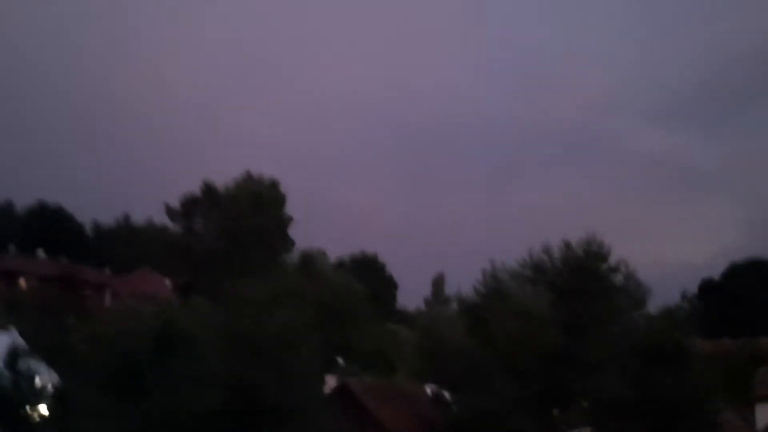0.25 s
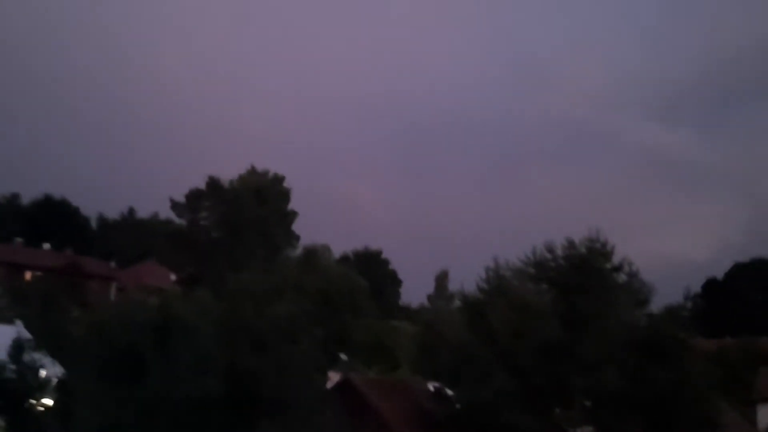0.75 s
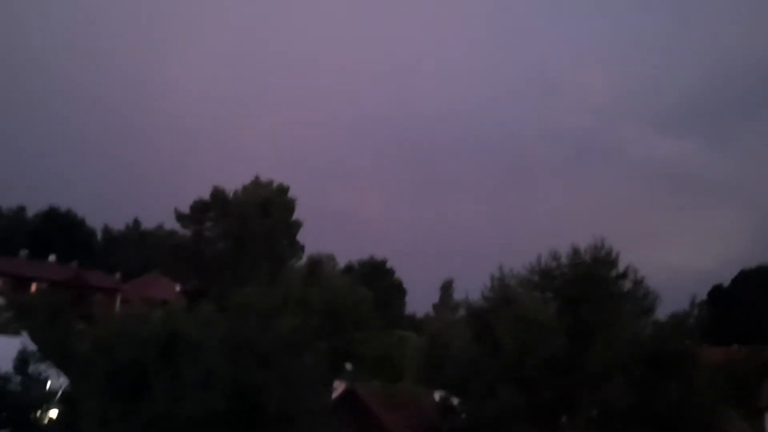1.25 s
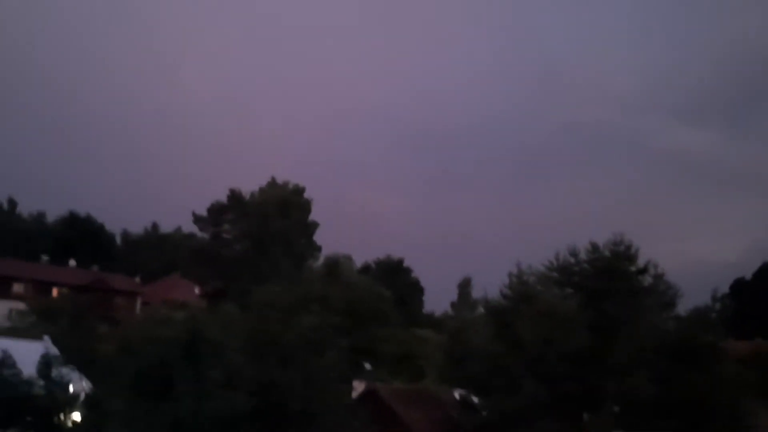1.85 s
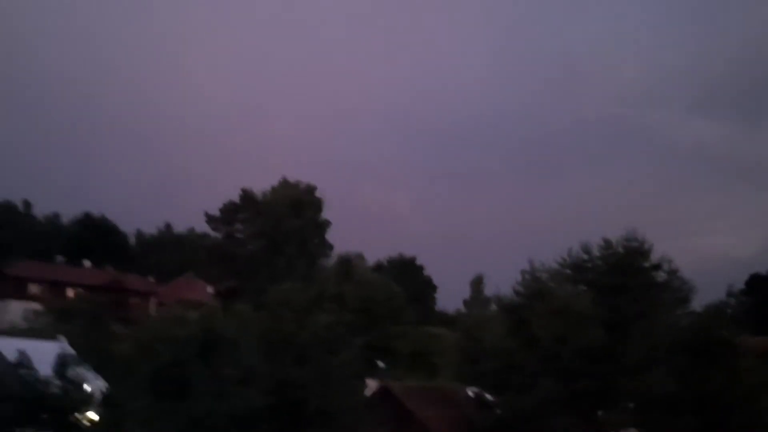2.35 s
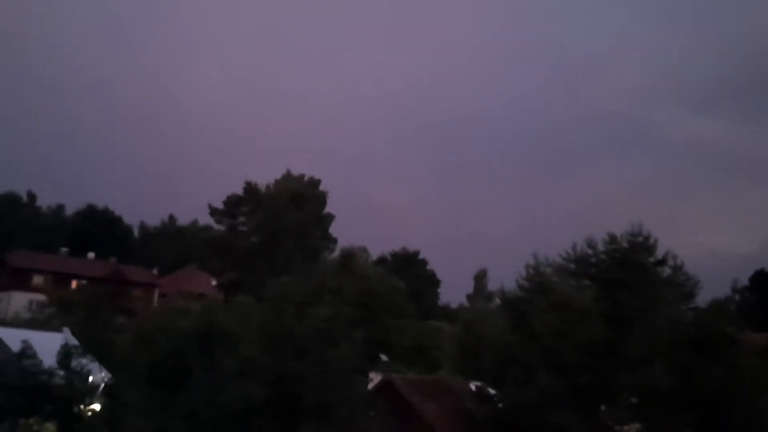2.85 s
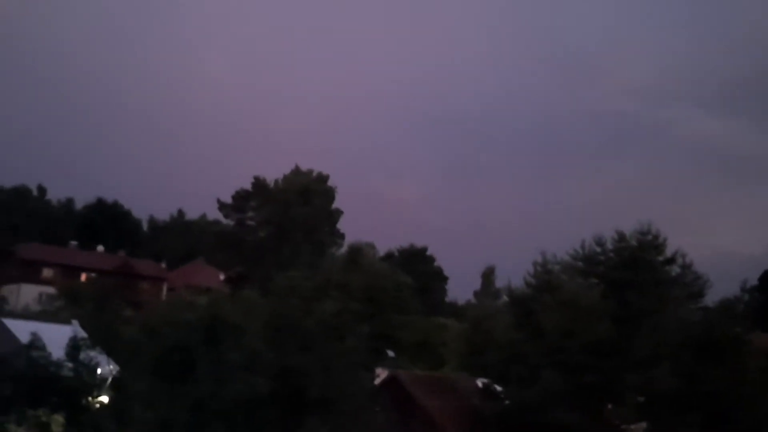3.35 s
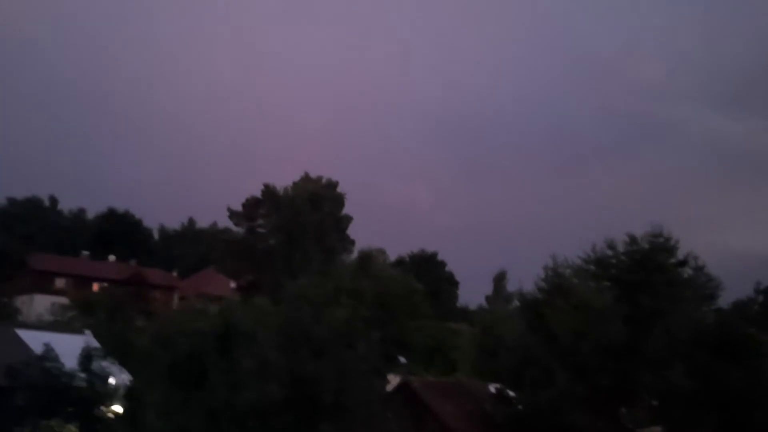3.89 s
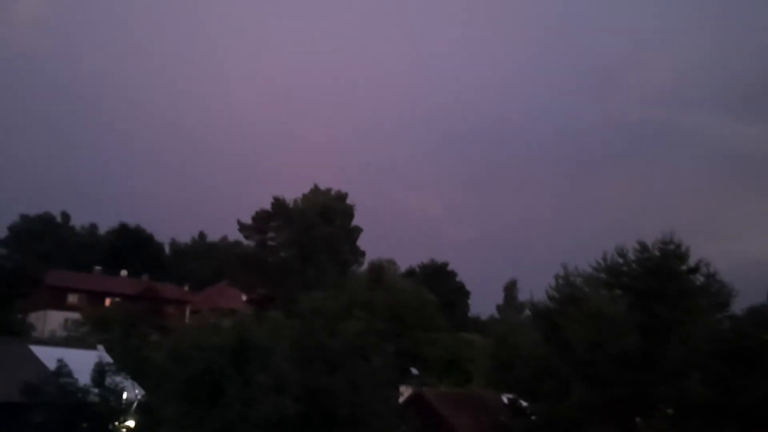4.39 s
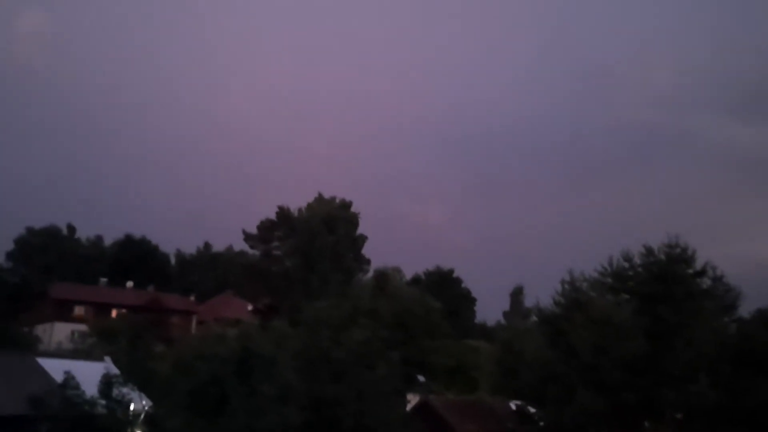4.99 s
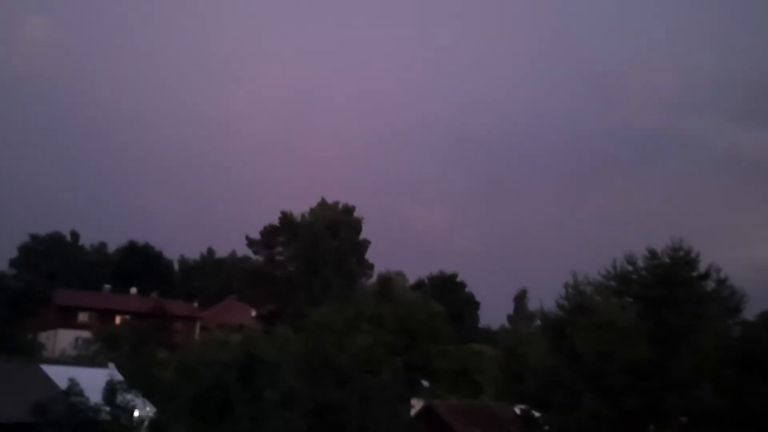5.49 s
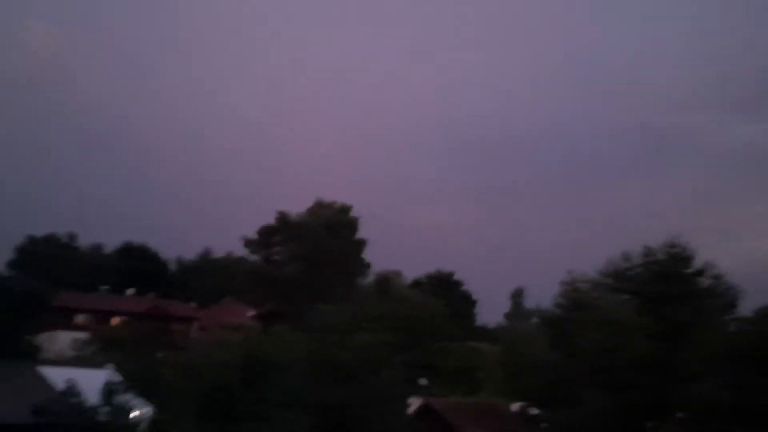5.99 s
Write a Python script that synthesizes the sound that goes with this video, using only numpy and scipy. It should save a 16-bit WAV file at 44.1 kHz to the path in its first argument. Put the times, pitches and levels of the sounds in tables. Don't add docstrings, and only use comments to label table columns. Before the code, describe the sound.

Outdoors at dusk, deep far thunder is already rolling and gradually dies away over faint town hum. A thrush whistles, gives two fast warbling trills, then thin upward hooks and piercing two-voiced falls. A distant bird hoots low under the early notes. After a pause, seven hoarse chips lead to a buzzy, hurried close. Phone stereo, notes scattering off trees and walls.

```python
import sys
import numpy as np
from scipy import signal
from scipy.fft import rfft, irfft, next_fast_len
from scipy.io import wavfile
from scipy.ndimage import uniform_filter1d

SR = 44100
rng = np.random.default_rng(int(sys.argv[2]) if len(sys.argv) > 2 else 0)


def file_out(sig):
    cols = np.atleast_2d(sig).T
    lim = np.clip(cols, -1, 1)
    pcm = np.round(lim * 32767).astype(np.int16)
    wavfile.write(sys.argv[1], SR, pcm)


def rack_gain(trim_db):
    fader = np.asarray(trim_db, float)
    return 10 ** (fader / 20)


N = 274937
FAST = next_fast_len(N)
HZ = np.maximum(np.fft.rfftfreq(FAST, 1 / SR), 1)
T = np.arange(N) / SR
OPPOSITE = np.array([[1], [-1]])
THROAT_HZ = 5650
OCTAVE_HZ = 6200


def spectrum(x):
    return rfft(x, FAST)


def wave(x):
    return irfft(x, FAST)[..., :N]


def shape(x, gain):
    return wave(spectrum(x) * gain)


def across(table, column, hz=HZ):
    table = np.array(table, float)
    return np.interp(np.log(hz), np.log(table[:, 0]), table[:, column])


def bell(hz, octaves):
    return np.cos(np.pi / 2 * np.clip(np.log2(HZ / hz) / octaves, -1, 1))


def walk(rate_hz):
    hold = int(SR / rate_hz)
    steps = np.repeat(rng.standard_normal(N // hold + 1), hold)
    return uniform_filter1d(uniform_filter1d(steps, hold), hold)[:N]


def density(db):
    return rack_gain(db) * np.sqrt(SR / 2)


def sides(balance_db):
    left = 2 / (1 + rack_gain(-2 * balance_db))
    return np.sqrt([left, 2 - left])


def thunder():
    # f/Hz, level/dB per Hz
    tone = [(12, -52), (20, -37.5), (59, -3.5), (81, 2), (123, 1), (149, -2.5), (229, -16.5), (310, -14.5),
            (426, -38), (560, -37), (732, -43), (818, -42), (900, -58.5), (1170, -70), (1980, -120)]
    borders = (10, 85, 200, 400, 950)
    out = 0
    for db, lo, hi in zip(peals(), borders, borders[1:]):
        arrivals = rng.standard_normal((2, FAST)) * (rng.random((2, FAST)) < 3000 / SR)
        mid, side = irfft(rfft(arrivals) * rack_gain(across(tone, 1)) * (HZ >= lo) * (HZ < hi), FAST)
        mid = mid / mid.std()
        mid = mid / (uniform_filter1d(mid ** 2, int(5 * SR / hi), mode="wrap") + 0.18) ** 0.13
        mid = np.roll(mid, -np.argmin(mid[:SR // 20]))
        apart = rack_gain(-26.5 + 5.7 * np.log2(hi / 85))
        band = mid / mid.std() + apart * side / side.std() * OPPOSITE
        out = out + band[:, :N] * rack_gain(db)
    return out


def peals():
    # t/s, level/dB
    roll = [(0, -32.5), (.6, -33), (.85, -35.5), (1.1, -34), (1.3, -31.5), (1.65, -46), (2.0, -42.5),
            (2.6, -47.5), (3.3, -51.5), (3.6, -55), (3.95, -47), (4.1, -52), (4.8, -54.5), (5.3, -46),
            (5.57, -57.5), (5.75, -57.5), (6.23, -51)]
    # t/s, level/dB, brightness/dB per band, half length/s
    bursts = [(0.131, -27, 3, 0.041), (0.334, -28, 4, 0.032), (0.448, -27.5, 3, 0.031),
              (0.578, -26.5, 0.5, 0.044), (0.929, -24.5, -4, 0.034), (0.694, -31.5, 3.5, 0.057),
              (1.072, -29, 2, 0.034), (1.115, -23.5, -5, 0.023), (1.217, -27, -1, 0.043),
              (1.352, -27, -7.5, 0.028), (1.532, -32.5, -0.5, 0.061), (1.72, -35, 0, 0.083),
              (2.265, -38, -2.5, 0.037), (2.43, -47, -23, 0.085), (2.534, -43, -29, 0.019),
              (3.185, -43, -11, 0.059), (3.372, -45.5, 9, 0.017), (3.47, -45, -7, 0.059),
              (3.672, -59.5, 13.5, 0.043), (3.752, -43, 6, 0.06), (4.201, -42.5, 5.5, 0.031),
              (4.296, -45, 9, 0.056), (4.485, -44.5, -0.5, 0.097), (4.82, -52, 12.5, 0.071),
              (5.007, -44, 17.5, 0.033), (5.096, -38.5, 5, 0.023), (5.179, -43, 19.5, 0.063),
              (5.36, -46, 10, 0.053), (5.437, -50.5, 9.5, 0.096), (5.671, -46.5, 9.5, 0.045),
              (5.853, -52, 15.5, 0.12), (5.974, -41.5, 11, 0.052)]
    # t/s, level/dB, half length/s
    cracks = [
        (3.703, -59.5, .06),
        (4.197, -61, .04),
        (4.327, -58.5, .04),
        (4.53, -66, .04),
        (5.0, -58, .03),
        (5.3, -62, .05),
    ]
    # roll offset/dB, share of the fading followed, peal offset/dB, share of brightness
    bands = [
        (-2.5, 0.85, -6, -0.45),
        (1, 0.98, -1, -0.029),
        (-9.5, 1.08, -13.5, 1.117),
        (-33, 0.12, -35.5, 1.37),
    ]
    t = T[::128]
    bed = np.interp(t, *np.transpose(roll))
    start_db = roll[0][1]
    s, db, tilt, half = np.transpose(bursts)[:, :, None]
    bumps = np.exp(-((t - s) / half) ** 2)
    at, crack_db, spread = np.transpose(cracks)[:, :, None]
    crack_power = np.sum(rack_gain(2 * crack_db) * np.exp(-((t - at) / spread) ** 2), axis=0)
    for band, (bed_db, follows, peal_db, bright) in enumerate(bands):
        power = rack_gain(2 * (start_db + bed_db + follows * (bed - start_db)))
        power = power + np.sum(rack_gain(2 * (db + peal_db + bright * tilt)) * bumps, axis=0)
        if band == len(bands) - 1:
            power = power + crack_power
        yield np.interp(T, t, 10 * np.log10(power))


def song():
    shake = walk(120), walk(300), walk(2200), walk(1300)
    return whistles(shake) + trills(shake) + hoarse(shake) + closing(shake) + hoots(shake)


def whistles(shake):
    # t/s, f/Hz, level/dB
    call = [(.186, 2350, -56), (.2, 2780, -56), (.21, 2694, -49.5), (.222, 3644, -45), (.231, 3310, -45.5),
            (.25, 3470, -42), (.259, 2930, -47.5), (.27, 2945, -48), (.281, 2750, -50), (.32, 2703, -47),
            (.35, 2545, -52), (.372, 2360, -57.5)]
    # t/s, length/s, from f/Hz, to f/Hz, level/dB
    upper = [
        (.194, 0.016, 3420, 3300, -65),
        (.224, 0.035, 3700, 3850, -58),
        (.254, .045, 3500, 3300, -54),
    ]
    # t/s, length/s, from f/Hz, to f/Hz, level/dB
    lead = [
        (1.865, .03, 2070, 2330, -63),
        (1.893, .012, 2450, 2780, -57),
    ]
    # t/s, length/s, top f/Hz, level/dB, octave overtone/dB
    rise = [
        (1.988, .026, 3760, -59, -13),
        (2.036, .024, 4720, -56, -28),
        (2.076, .03, 5300, -51, -42),
    ]
    # t/s, length/s, from f/Hz, to f/Hz, level/dB
    falls = [
        (2.116, .088, 9500, 4620, -46.5),
        (2.115, .088, 6750, 3600, -48),
        (2.277, .13, 8400, 5550, -46),
        (2.276, .124, 6800, 4080, -50),
    ]
    # t/s, length/s, from f/Hz, to f/Hz, level/dB
    steps = [
        (2.46, .028, 7980, 7620, -62),
        (2.5, .035, 6920, 6830, -55),
        (2.518, .024, 6550, 6150, -48),
        (2.54, .02, 5850, 5500, -49),
    ]
    # t/s, length/s, from f/Hz, to f/Hz, level/dB
    quiet = [
        (3.515, .145, 2800, 2906, -72.5),
        (3.61, .1, 3040, 3180, -82),
    ]
    first = [repeat(call, 0, 0, 0, 0, over_db=-40)]
    first += [glide(*row, over_db=-50.5, swell_db=0.5, fade_db=2, crest=.27) for row in upper]
    bright = [hook(*row) for row in rise] + [fall(*row) for row in falls]
    bright += [glide(*row, over_db=-34, swell_db=-4, fade_db=-4) for row in steps]
    bright += [glide(*row, over_db=-10.5, swell_db=-9, fade_db=-11, crest=.35) for row in quiet]
    bright += [glide(*row, over_db=-5, swell_db=2, fade_db=2, crest=.73) for row in lead]
    out = sing_all(first, shake, tremor_hz=40, flutter_db=2, air_db=-17, ramp_s=.003, husky=.6, throat=1)
    return out + sing_all(bright, shake, tremor_hz=25, flutter_db=3.2, air_db=-28, husky=.3)


def trills(shake):
    # t after the start/s, f/Hz, level/dB
    arch = [
        (0, 2100, -56),
        (.017, 2250, -55),
        (.034, 3000, -44),
        (.059, 3300, -43),
        (.11, 3070, -42.5),
        (.16, 2920, -42.5),
        (.188, 2760, -45),
        (.199, 2480, -54),
    ]
    # t/s, cut from the start/s, level/dB, lean/dB
    starts = [
        (.476, 0, 1, -.5),
        (.789, .014, 1.5, -1),
    ]
    # t/s, length/s, from f/Hz, to f/Hz, level/dB
    grace = [
        (.461, .04, 2750, 3600, -48),
        (.497, .028, 3550, 3950, -51),
        (.52, .04, 3900, 3550, -50),
        (.791, .017, 3200, 2350, -48),
        (.797, .026, 3300, 3750, -49),
        (.82, .055, 3850, 3600, -50),
    ]
    bend = warble()
    arches = [repeat(arch, *row, over_db=-34) for row in starts]
    graces = [glide(*row, over_db=-33, swell_db=-8, fade_db=-4, crest=.6) for row in grace]
    out = sing_all(arches, shake, bend_hz=bend, crest_db=-4, tremor_hz=40, flutter_db=1.5, air_db=-21,
                   ramp_s=.004, husky=.9, throat=1)
    return out + sing_all(graces, shake, bend_hz=bend, tremor_hz=90, husky=1, throat=1, air_db=-8, ramp_s=.004)


def warble(depth_hz=780, rise=.62, peaked=2.6, tire_s=.9, grow_s=.06):
    # t of a crest/s, rate f/Hz, slowing/Hz per s
    rounds = [
        (.510, 76.5, 160),
        (.8244, 76.5, 120),
    ]
    out = np.zeros(N)
    for s, rate_hz, slowing in rounds:
        since = T - s
        near = abs(since - .07) < .15
        turns = rate_hz * since - slowing * since ** 2 / 2
        height = (1 + signal.sawtooth(2 * np.pi * (turns + rise), rise)) / 2
        flick = height ** peaked - 1 / (1 + peaked)
        out += near * flick * np.clip(1 - since / tire_s, 0, 1) * np.clip(1 + since / grow_s, .55, 1)
    return depth_hz * uniform_filter1d(out, int(.003 * SR))


def hoarse(shake):
    # t/s, top f/Hz, level/dB, octave overtone/dB, tick/dB
    chips = [
        (5.184, 3050, -60, -16, -76),
        (5.279, 3150, -58, -14, -78),
        (5.362, 3390, -53, -14, -70),
        (5.448, 3450, -52, -27, -63),
        (5.548, 3600, -54, -25, -69),
        (5.637, 3780, -51, -27, -74),
        (5.729, 3750, -53, -27, -68),
    ]
    # t/s, length/s, from f/Hz, to f/Hz, level/dB
    asides = [
        (1.916, 0.012, 2970, 5300, -61),
        (2.12, .014, 1960, 1243, -45.5),
    ]
    # t/s, f/Hz, level/dB, octave overtone/dB
    haze = [
        (5.755, 7200, -97, -41),
        (5.85, 8000, -92, -41),
    ]
    # t/s, length/s, from f/Hz, to f/Hz, level/dB
    husk = [(5.177, .016, 4650, 5200, -77), (5.276, .017, 6050, 6150, -79), (5.356, .015, 4350, 4600, -72),
            (1.991, .1, 6900, 7050, -81), (1.872, .05, 6400, 6850, -84), (.181, .035, 4300, 5000, -83),
            (.481, .035, 4300, 4600, -71), (.796, .03, 4300, 4700, -75), (5.181, .23, 5150, 4900, -84),
            (5.182, .23, 6500, 6400, -88), (5.441, .28, 6600, 6700, -91), (5.721, .03, 6600, 6800, -84)]
    rough = [glide(*row, over_db=-38, swell_db=-30, fade_db=-15) for row in asides]
    for row in chips:
        rough += chip(*row)
    puffs = [glide(*row, swell_db=-1.5, fade_db=-1.5) for row in husk]
    out = sing_all(rough, shake, tremor_hz=150, flutter_db=2.4, air_db=-10, ramp_s=.0035)
    out += sing(haze, shake, tremor_hz=604, air_db=16.5)
    return out + sing_all(puffs, shake, tremor_hz=500, air_db=6)


def chip(s, top_hz, db, over_db, tick_db, half_s=.008):
    tick = [(s - .01, 3800, tick_db, -30), (s - .004, 4400, tick_db, -30)]
    flick = [(s - half_s, 0.52 * top_hz, db - 4, over_db - 6),
             (s, top_hz, db, over_db - 9),
             (s + half_s, 0.6 * top_hz, db - 6, over_db)]
    return [tick, flick]


def closing(shake):
    # t after the start/s, f/Hz, level/dB
    motif = [
        (0, 4300, -76),
        (.008, 4600, -63),
        (.044, 4680, -59),
        (.057, 5150, -60),
        (.066, 6000, -57),
        (.072, 6400, -56),
        (.082, 5900, -57),
        (.093, 5100, -63),
    ]
    # t/s, cut from the start/s, level/dB, lean/dB
    starts = [
        (5.829, 0, -1.5, -6),
        (6.011, 0, -.5, 4),
    ]
    # t/s, f/Hz, level/dB, octave overtone/dB
    held = [
        [(5.835, 8150, -80, -34), (5.86, 7850, -64, -34), (5.887, 7350, -57, -34), (5.894, 7900, -75, -34),
         (5.903, 9200, -80, -34), (5.917, 7000, -55, -34), (5.928, 6350, -61, -34)],
        [(6.02, 7850, -78, -34), (6.04, 7550, -64, -34), (6.063, 7350, -59, -34), (6.072, 7800, -74, -34),
         (6.084, 8500, -73, -34), (6.093, 7000, -55, -34), (6.104, 6000, -55, -34)],
    ]
    # t/s, length/s, from f/Hz, to f/Hz, level/dB
    last = [
        (6.162, .008, 8900, 7960, -75),
        (6.173, 0.0071, 9100, 7840, -72),
        (6.184, .009, 9020, 7900, -69),
        (6.194, .01, 8980, 7840, -70),
        (6.204, 0.013, 8760, 7540, -65),
        (6.217, .014, 8830, 7410, -61.5),
        (6.222, 0.009, 6600, 6080, -52),
    ]
    # t/s, f/Hz, level/dB, octave overtone/dB
    quaver = [
        (6.165, 6900, -68, -34),
        (6.19, 7000, -59, -34),
        (6.205, 6850, -55, -34),
        (6.222, 6700, -54, -34),
    ]
    notes = [repeat(motif, *row, over_db=-33) for row in starts] + held
    notes += [glide(*row, over_db=-37.5, bend=.79, swell_db=-9, fade_db=1.5, crest=.68) for row in last]
    out = sing_all(notes, shake, tremor_hz=39.6, flutter_db=3.5, air_db=-12.5, ramp_s=.0022, husky=.8)
    depth_hz, rate_hz, crest_s = 230, 91, 6.197
    bend = depth_hz * np.cos(2 * np.pi * rate_hz * (T - crest_s))
    return out + sing(quaver, shake, bend_hz=bend, crest_db=-8, air_db=-14)


def hoots(shake):
    # t/s, f/Hz, level/dB, octave overtone/dB
    calls = [
        [(.89, 975, -63.5, -29), (1.32, 972, -64, -29)],
        [(1.37, 948, -64, -29), (1.47, 920, -61.5, -29), (1.66, 948, -64, -29)],
    ]
    return sing_all(calls, shake, tremor_hz=4, flutter_db=0.5, ramp_s=.02)


def sing_all(notes, shake, **voice):
    return sum(sing(note, shake, **voice) for note in notes)


def sing(note, shake, bend_hz=0, tremor_hz=30, flutter_db=-0.5, air_db=-24, ramp_s=.0014, crest_db=0,
         husky=0, throat=0):
    s, *columns = np.transpose(note)
    span = slice(int(s[0] * SR), min(int(s[-1] * SR), N))
    t = T[span]
    smooth = int(.0032 * SR)
    hz, db, over_db = (uniform_filter1d(np.interp(t, s, c), smooth, mode="nearest") for c in columns)
    phase = 2 * np.pi * np.cumsum(hz + (bend_hz + tremor_hz * shake[1])[span]) / SR
    passed = 1 - throat + throat * np.exp(-((2 * hz - OCTAVE_HZ) / 620) ** 2)
    octave = rack_gain(over_db) * passed * (1 - husky + 2 * husky * shake[3][span])
    twelfth = rack_gain(1.6 * over_db - 17)
    tone = np.sin(phase) + octave * np.sin(2 * phase) + twelfth * np.sin(3 * phase)
    tone *= 1 + rack_gain(air_db) * shake[2][span]
    edges = np.clip(np.minimum(t - s[0], s[-1] - t) / ramp_s, 0, 1)
    level = db + (flutter_db * shake[0] + crest_db * bend_hz / 1000)[span]
    return np.pad(np.sqrt(2) * tone * rack_gain(level) * edges, (span.start, N - span.stop))


def glide(s, length, from_hz, to_hz, db, over_db=-32, bend=1, rest=0, swell_db=-8, fade_db=-6, crest=.46):
    u = np.linspace(0, 1, 13)
    moved = np.clip((u - rest) / (1 - 2 * rest), 0, 1) ** bend
    hz = from_hz * (to_hz / from_hz) ** moved
    level = db + np.interp(u, [0, crest, 1], [swell_db, 0, fade_db])
    return np.transpose([s + u * length, hz, level, over_db + 0 * u])


def fall(s, length, from_hz, to_hz, db):
    hold_s = .012 if from_hz < 7500 else .004
    note = glide(s, length, from_hz, to_hz, db, over_db=-36, bend=.9, rest=hold_s / length,
                 swell_db=-4, fade_db=-5, crest=.6)
    off = np.log2(note[:, 1] / THROAT_HZ)
    note[:, 3] -= 40 * abs(np.log2(note[:, 1] / OCTAVE_HZ))
    note[:, 2] += np.where(off > 0, -63, -20) * off ** 2
    return note


def hook(s, length, top_hz, db, over_db):
    note = glide(s, length, .99 * top_hz, 1.01 * top_hz, db, over_db, swell_db=-4, fade_db=-10, crest=.35)
    scoop_hz, scoop_s = 1300, .0034 * (THROAT_HZ / top_hz) ** 2
    note[:, 1] -= scoop_hz * np.exp(-((note[:, 0] - s) / scoop_s) ** 1.6)
    return note


def repeat(learnt, s, cut_s, db, lean_db, over_db):
    after, hz, level = np.transpose(learnt)
    lean = lean_db * np.linspace(-1, 1, len(hz))
    late = np.maximum(after, cut_s)
    hz, level = np.interp(late, after, hz), np.interp(late, after, level)
    return np.transpose([s + late, hz, level + db + lean, over_db + 0 * hz])


def garden(dry, order):
    # f/Hz, left minus right level/dB, left lead/rad, response/dB
    ports = [(1500, 15, 12, -1), (2440, 9, -1.5, -0.5), (3440, 9, -1.5, -3), (4200, 5.5, 2, -7),
             (5100, -1, 0.67, -6.5), (6730, -2, 2.5, 0), (7000, 2, 5, -2.5), (8500, -3.5, 3.5, 6),
             (9800, 4.5, 10, -13.5), (11440, 2.5, 2.5, 8), (14000, 2, 12, 4)]
    # f/Hz, time to fall 60 dB/s, level from the first perch/dB, level from the last perch/dB
    scatter = [
        (2000, 1.1, -11, -4),
        (3000, 1.0, -11, -6.5),
        (3800, .75, -8, -7.5),
        (4600, .65, -9.5, -9),
        (5400, .65, -9, -1),
        (6400, .65, -8.5, -3),
        (7500, .6, -8, -6),
        (8500, .5, -7, -6),
        (12000, .35, -9, -9),
    ]
    # delay t/s, spread/s, level/dB
    echoes = [
        (.045, .012, 5),
        (0.111, 0.015, -3.5),
        (.275, 0.026, -10.5),
    ]
    leaves, tail = spectrum(rng.standard_normal((2, N))), 0
    walls = rack_gain(sum(db * np.exp(-((T - s) / spread) ** 2) for s, spread, db in echoes))
    for hz in 800 * 2 ** np.arange(0, 4.5, 1 / 3):
        t60 = across(scatter, 1, hz)
        fade = np.exp(-np.log(1000) * T / t60) * np.clip(T / .01, 0, 1) * walls
        tail = tail + wave(leaves * bell(hz, 1 / 3)) * fade / np.sqrt(np.sum(fade ** 2))
    lead = np.exp(.5j * across(ports, 2) * OPPOSITE)
    twigs = rng.standard_normal((2, N)) * np.exp(-np.log(1000) * T / .07) * (T > .002)
    twigs = spectrum(twigs / np.sqrt(np.sum(twigs ** 2, axis=1, keepdims=True))) * rack_gain(-9)
    sway = 1 + 2.2 * walk(900)
    swayed = dry * sway / np.sqrt(np.mean(sway ** 2))
    heard = spectrum(dry) * (lead + twigs)
    heard = heard + spectrum(swayed) * spectrum(tail) * rack_gain(across(scatter, order))
    return wave(heard * rack_gain(across(ports, 3)) * sides(across(ports, 1)))


def town():
    # f/Hz, level/dB per Hz, left minus right level/dB, likeness of the ports (-1 to 1)
    hum = [(305, -83.5, -15, 0.85), (384, -93.5, 0, 0.37), (640, -92.5, 10, 0.31), (715, -89.5, -4, 0.51),
           (1042, -87, 9, -0.97), (1166, -94.5, -1, -0.35), (1620, -90, 7, -0.3), (1680, -90.5, 8.5, -0.47),
           (2102, -97, 11.5, 0.89), (2360, -101.3, 11, -0.049), (2690, -107.9, 17.5, 0.73),
           (3040, -116.4, 5.5, -0.0093), (3400, -119.2, 9, -0.9), (4400, -122.1, -0.5, -1.1)]
    # t/s, level/dB
    swell = [(0.0, -64.5), (0.47, -62), (0.919, -62.5), (1.32, -64), (1.58, -62), (2.0, -63), (2.31, -62.5),
             (3.04, -63), (3.44, -62), (4.72, -64), (5.331, -60), (5.57, -61.5), (6.23, -62.5)]
    first, second = spectrum(rng.standard_normal((2, N))) * density(across(hum, 1)) * (HZ > 260)
    like = np.clip(across(hum, 3), -1, 1)
    pair = np.array([first, like * first + np.sqrt(1 - like ** 2) * second]) * sides(across(hum, 2))
    s, db = np.transpose(swell)
    out = 0
    for hz in 250 * 2 ** np.arange(0, 4.6, 1 / 3):
        out = out + wave(pair * bell(hz, 1 / 3)) * rack_gain(0.4 * walk(1.5) + 2.27 * walk(11))
    return out * rack_gain(np.interp(T, s, db - db.mean()))


def scene():
    bird = song()
    late = T > 5
    early_bird = garden(bird * ~late, order=2)
    ending = garden(np.roll(bird * late, -2 * SR), order=3)
    return thunder() + town() + early_bird + np.roll(ending, 2 * SR, axis=1) * late


def band_limit(x):
    return signal.sosfilt(signal.butter(12, 15720, fs=SR, output="sos"), x)


def record(dry):
    # f/Hz, level/dB per Hz
    port_noise = [
        (1200, -150),
        (2500, -121),
        (4500, -123),
        (7500, -125),
        (9500, -128),
        (11000, -125),
        (14000, -123),
        (16000, -125),
    ]
    alike, apart = shape(rng.standard_normal((2, N)), density(across(port_noise, 1) - 2))
    hiss = alike + rack_gain(-6) * apart * OPPOSITE
    loudness = uniform_filter1d(abs(dry), int(.05 * SR), axis=1)
    grit = shape(rng.standard_normal((2, N)), HZ > 10500) * loudness
    return band_limit(dry + hiss + rack_gain(-53) * grit)


dry = scene()
out = record(dry)
file_out(out)
```